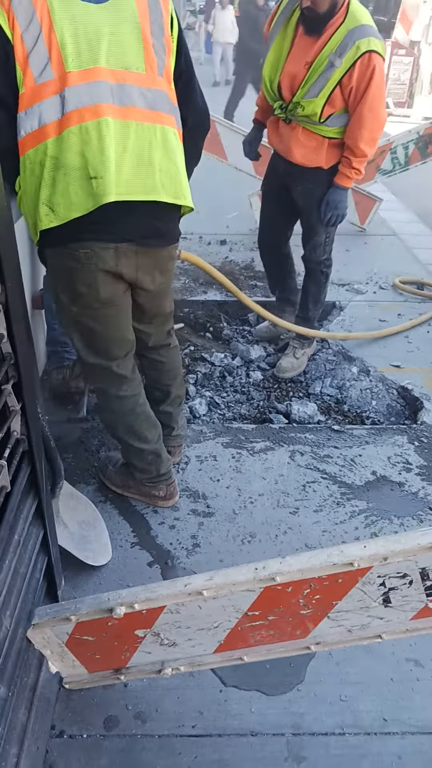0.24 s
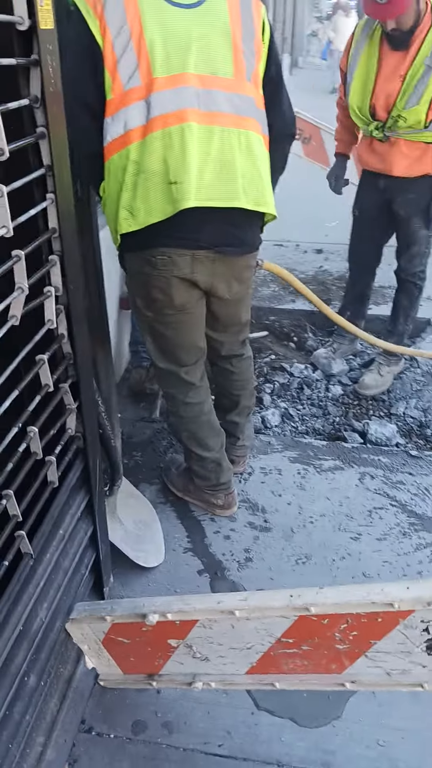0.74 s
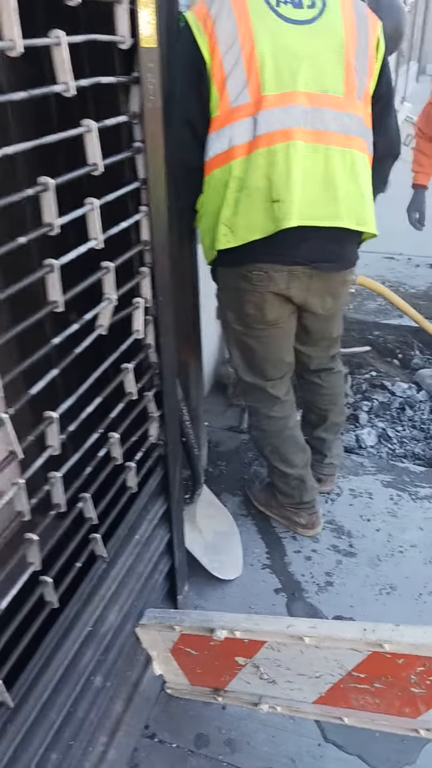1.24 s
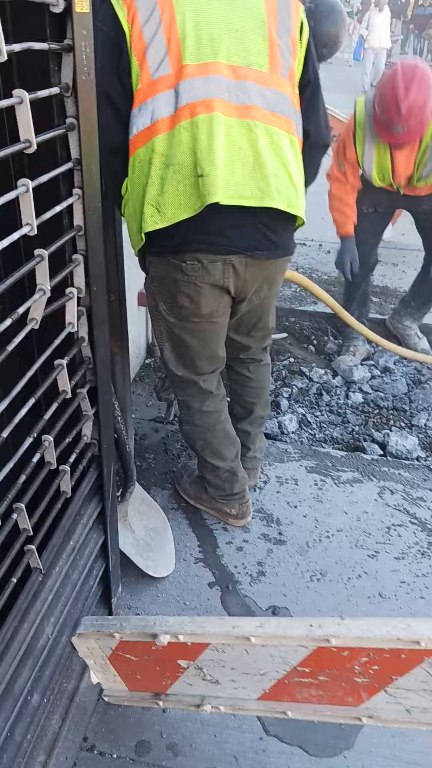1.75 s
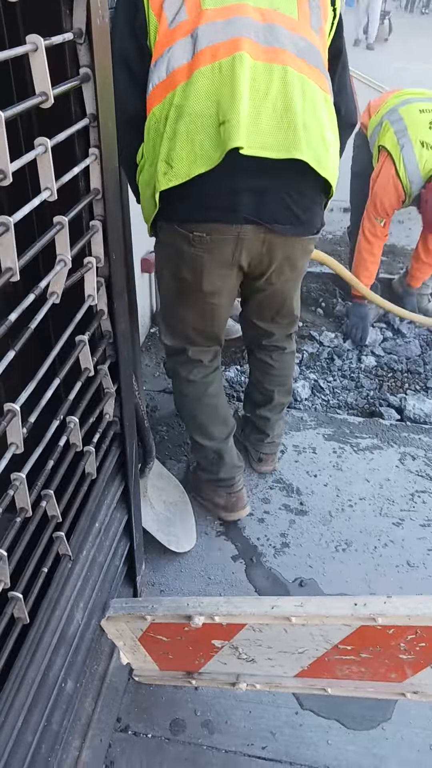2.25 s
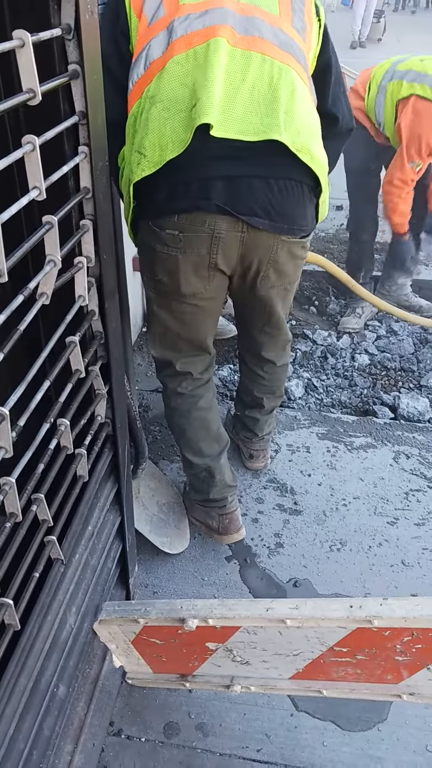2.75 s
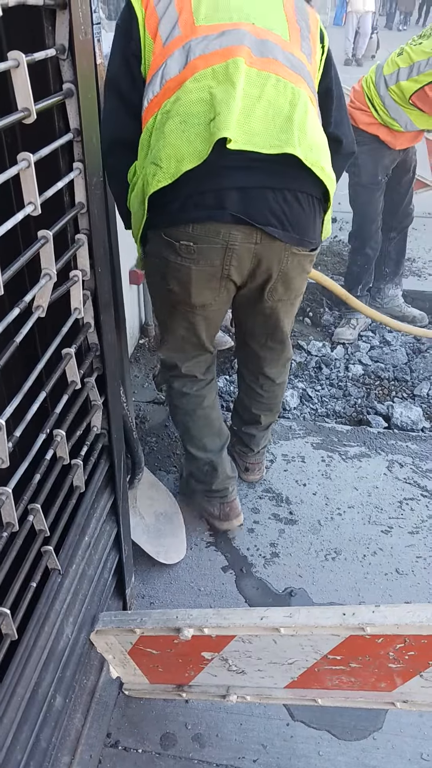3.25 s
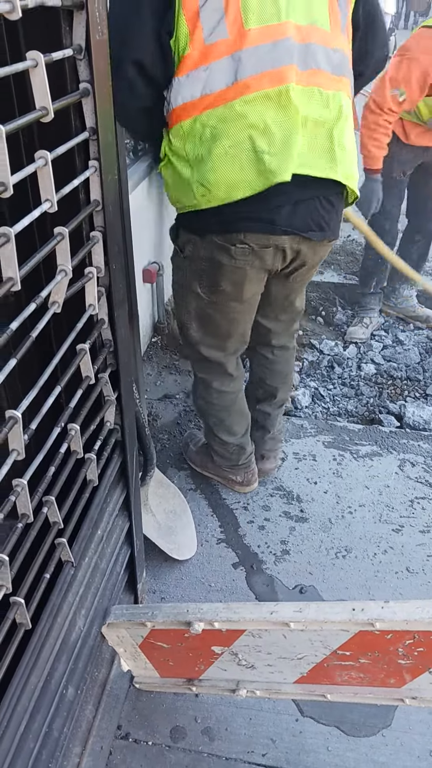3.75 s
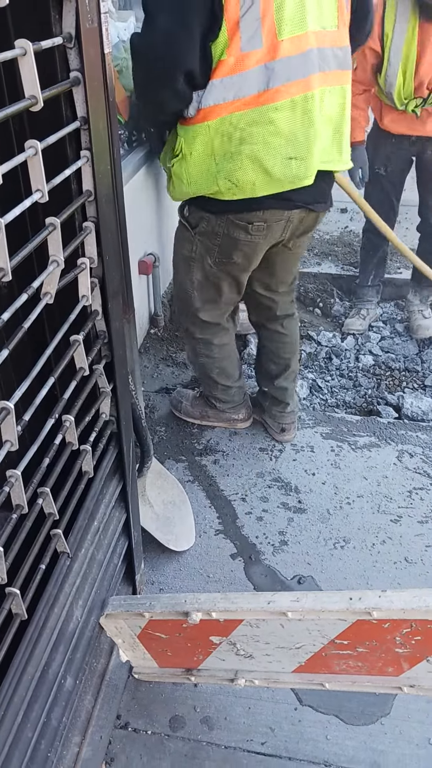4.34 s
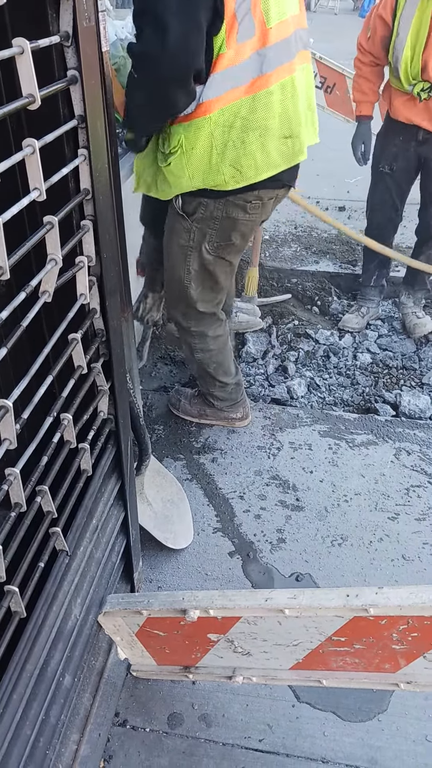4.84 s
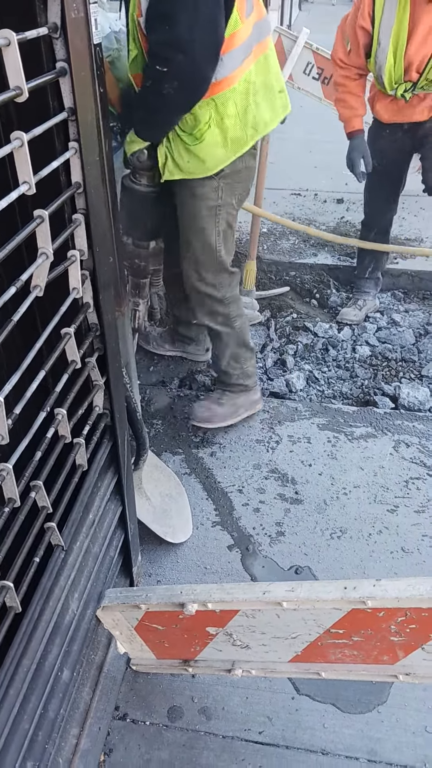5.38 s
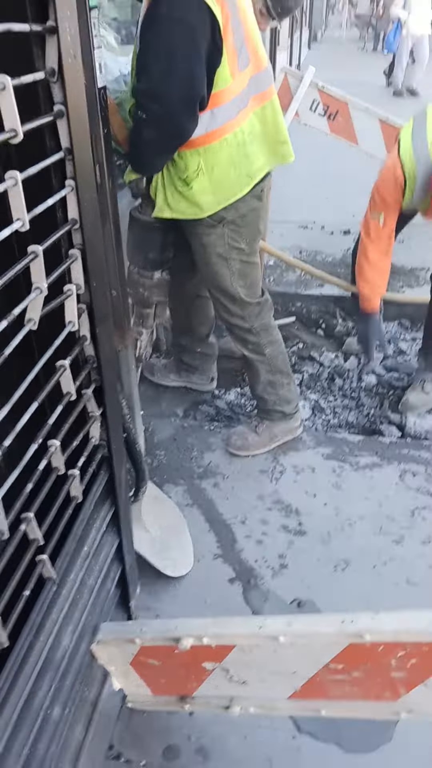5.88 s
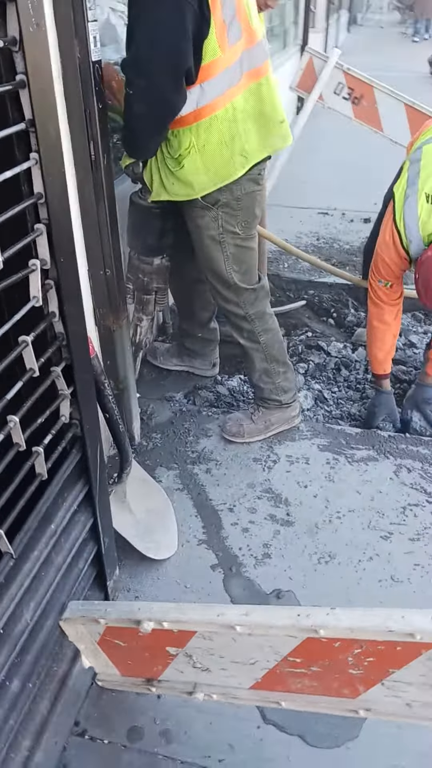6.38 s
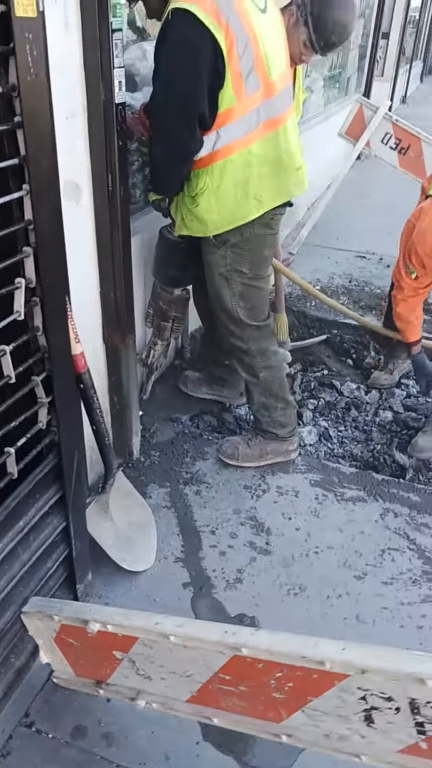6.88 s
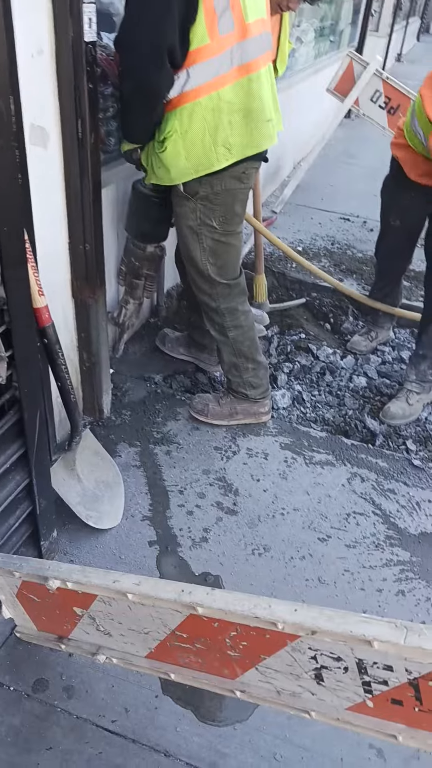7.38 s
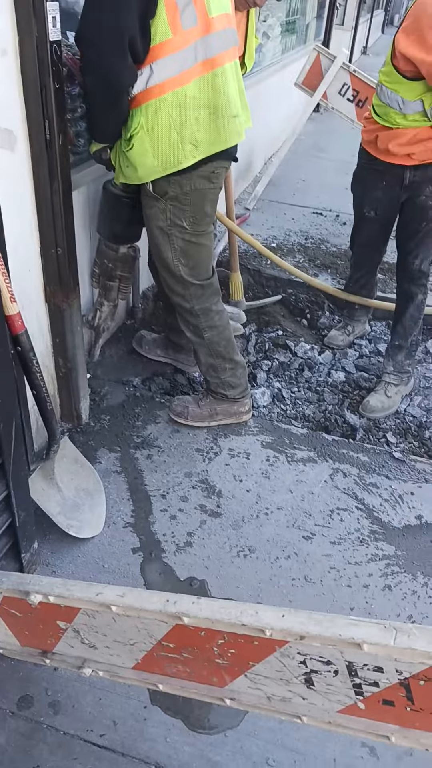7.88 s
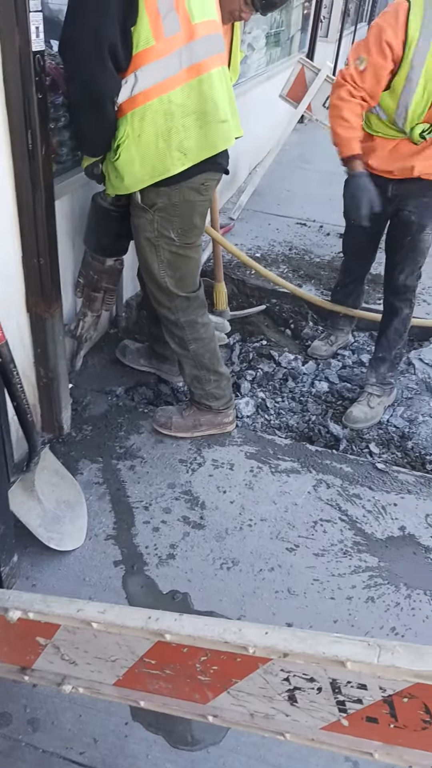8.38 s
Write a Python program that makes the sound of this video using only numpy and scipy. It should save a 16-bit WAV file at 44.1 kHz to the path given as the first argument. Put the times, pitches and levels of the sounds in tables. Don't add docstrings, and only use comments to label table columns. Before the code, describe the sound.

Loud jackhammer already running: deep exhaust pops, gritty air blasts and metallic bit ring in a fast rattle. It cuts off to low engine drone and street rumble; a very short false start follows, then the bit drags over rubble and crumbs tick down. Isolated thuds lead into a second long burst, its ring growing duller as the bit sinks. Outdoor street beside a shop front, handheld stereo, short wall reflections.

```python
import sys
import numpy as np
from scipy import signal
from scipy.fft import rfft, irfft, next_fast_len
from scipy.io import wavfile
from scipy.ndimage import uniform_filter1d

SR = 44100
rng = np.random.default_rng(int(sys.argv[2]) if len(sys.argv) > 2 else 0)


def pcm_store(signal):
    levels = np.round(np.clip(np.atleast_2d(signal), -1, 1) * 32767)
    wavfile.write(sys.argv[1], SR, levels.astype(np.int16).T)


N = 380141

# start_s, load
BACKGROUND_LOAD = [(0, 0.5), (2.05, 0.52), (2.25, .55), (2.55, .15), (3.3, 0.01), (3.5, 0.83), (4.0, 0.46),
                   (4.5, 0.09), (4.85, 0.19), (5.05, 0.97), (5.2, 0.88), (5.35, 0.99), (5.55, 0.98),
                   (5.75, 0.37), (8.6, 0.87)]
RETURN_S, LEAD_S = .0245, .0035


def gain_of(db):
    return np.exp(np.asarray(db) * (np.log(10) / 20))


def evened(x):
    return x / np.sqrt(np.mean(x ** 2) + 1e-20)


def read(points, hz):
    f, value = np.transpose(points)
    return np.interp(np.log(hz + 1), np.log(f + 1), value)


def coloured(x, points):
    size = next_fast_len(N)
    hz = np.fft.rfftfreq(size, 1 / SR)
    return irfft(rfft(x, size) * gain_of(read(points, hz)), size)[..., :N]


def train(s, size):
    return np.bincount(np.clip(np.round(s * SR).astype(int), 0, N - 1), size, N)


def ringing(modes, length):
    t = np.arange(length) / SR
    return sum(gain_of(db - 60 * t / t60) * np.sin(2 * np.pi * hz * t) for hz, db, t60 in modes)


def resonate(x, hz, width):
    turn = np.exp(2j * np.pi * np.cumsum(hz * np.ones(N)) / SR)
    r = np.exp(-np.pi * width / SR)
    return 2 * (turn * signal.lfilter([1 - r], [1, -r], x * turn.conj())).real


def lumps(width):
    once = uniform_filter1d(rng.standard_normal(N), int(width))
    return evened(uniform_filter1d(once, int(width)))


def pair(same, lead):
    a, b = rng.standard_normal((2, N))
    return np.array([a, same * np.roll(a, lead) + np.sqrt(1 - same ** 2) * b])


def mottled(x, patchy_db):
    z = signal.stft(x, nperseg=512)[2]
    patches = uniform_filter1d(rng.standard_normal(z.shape[:0:-1]), size=7, axis=0)
    patches = uniform_filter1d(patches, size=6, axis=1).T
    return signal.istft(z * gain_of(patchy_db * evened(patches)), nperseg=512)[1][:, :N]


def street():
    # pitch_hz, level_db (per Hz)
    wash_spectrum = [(18, -46), (30, -18), (69, -14), (97, -15.5), (168, -21), (284, -25), (673, -33),
                     (874, -33.5), (1360, -33.5), (1640, -33), (5740, -47), (6720, -54), (8060, -49.5),
                     (15500, -44.5)]
    # pitch_hz, width_hz, level_db
    fan_whine = [(1400, 44, -56.5)]
    # pitch_hz, likeness (-1 to 1)
    likeness = [(60, 0.3), (180, 1), (550, 0.19), (1650, -0.41), (4970, 0.12), (15000, -0.12)]
    frames, hz = N // 256 + 5, np.fft.rfftfreq(2048, 1 / SR)
    a, b, c, d, patches = rng.standard_normal((frames // 2 + 4, len(hz), 5)).T
    patches = evened(uniform_filter1d(uniform_filter1d(patches, 14, 0), 6, 1))
    same = np.clip(read(likeness, hz), -1, 1)[:, None]
    left = a + 1j * b
    right = same * left + np.sqrt(1 - same ** 2) * (c + 1j * d)

    load = np.clip(np.interp(np.arange(a.shape[1]) * 512 / SR, *np.transpose(BACKGROUND_LOAD)), 0, 2)
    rumble_db = -37.5 + 15 * load ** 2.3
    wash_db = -38 + 11.5 * load
    leak_db = -66 + 12 * load
    upper = np.clip(np.log2(hz / 200 + 1e-9), 0, 1)[:, None]
    treble_db = 0.5 * load * np.log2(np.maximum(hz / 4000, 1))[:, None]

    z = np.array([left, right]) * gain_of(read(wash_spectrum, hz)[:, None] + 1.3 * patches)
    z = z / np.sqrt(np.mean(abs(z) ** 2))
    z *= gain_of(rumble_db + upper * (wash_db - rumble_db) + treble_db)
    lines = sum(gain_of(db) / np.sqrt(width) * np.exp(-((hz - f) / (width + 12)) ** 2)
                for f, width, db in fan_whine)
    z += gain_of(50) * lines[:, None] * left * gain_of(rumble_db + 16)
    leak_band = np.exp(-((hz[:, None] - 6825) / 110) ** 2)
    z += leak_band * (c + 1j * b) * gain_of(leak_db + 19.0)
    return signal.istft(z, nperseg=2048, noverlap=1536)[1][:, :N] / 32


def engines():
    # start_s, firing_hz
    firing = [(0, 92), (2.3, 90), (2.7, 88), (3, 82), (3.4, 82), (5.55, 79), (6.2, 80), (8.6, 89)]
    # firing_multiple, level_db (rms, idling)
    compressor_orders = [(.5, -45), (1, -41), (1.5, -49), (2, -49), (4, -62)]
    # firing_multiple, level_db (rms)
    truck_orders = [(1, -40.5), (2, -49)]
    t = np.arange(0, N + 64, 64) / SR
    load = np.clip(np.interp(t, *np.transpose(BACKGROUND_LOAD)), 0, 2)
    compressor_hz, truck_hz = np.interp(t, *np.transpose(firing)), 63.3 + 0 * t
    out = 0
    for hz, orders in ((compressor_hz, compressor_orders), (truck_hz, truck_orders)):
        for k, db in orders:
            waver = uniform_filter1d(rng.standard_normal(len(t)), size=70)
            waver = evened(uniform_filter1d(waver, size=70))
            turns = k * np.cumsum(hz) * 64 / SR + rng.random()
            out = out + gain_of(db + 2 + 10.3 * load ** 2.6 + 2.9 * waver) * np.sin(2 * np.pi * turns)
    return signal.resample_poly(out, up=64, down=1)[:N]


def walls(x):
    # pitch_hz, t60_s
    wall_decay = [(100, 0.17), (500, 0.35), (2000, 0.35), (8000, 0.044), (16000, 0.074)]
    taps = np.zeros((2, SR // 2))
    at = np.arange(300, SR // 2 - 20, 20) + rng.integers(0, 20, (2, (SR // 2 - 301) // 20))
    np.put_along_axis(taps, at, rng.choice([-1., 1.], at.shape), 1)
    hz, t, z = signal.stft(taps, SR, nperseg=256)
    tail = signal.istft(z * gain_of(-60 * t / read(wall_decay, hz)[:, None]), SR, nperseg=256)[1]
    return signal.fftconvolve(x, tail / np.linalg.norm(tail[0]), axes=1)[:, :N]


def crumbs():
    # start_s, level_db, pitch_hz, t60_s
    falls = [(2.877, -41.5, 1400, 0.051), (3.1, -46.5, 2000, 0.072), (3.961, -34, 4060, 0.076),
             (4.104, -44, 1820, 0.26), (4.124, -60, 11000, .05), (4.37, -50, 9000, 0.063),
             (3.965, -43, 10500, 0.077), (5.553, -37, 2200, .06), (4.15, -38, 3300, 0.054),
             (4.37, -46, 2500, 0.068), (5.312, -36.5, 2510, 0.075), (5.52, -38, 2220, 0.47),
             (5.572, -21.5, 2210, 0.063)]
    out, t = np.zeros((2, N)), np.arange(SR // 8) / SR
    for s, db, hz, t60 in falls:
        band = signal.butter(2, [hz / 1.4, hz * 1.4], "band", fs=SR, output="sos")
        grit = signal.sosfilt(band, rng.standard_normal((2, len(t))))
        at = round(s * SR)
        out[:, at:at + len(t)] += evened(grit) * gain_of(db + 6.0 - 60 * t / t60) * np.minimum(t / 0.0048, 1)
    return out


def dragging():
    # start_s, grind_s, level_db
    drags = [
        (3.735, 0.036, -40.5),
        (3.885, 0.064, -37.5),
        (4.09, 0.055, -62),
        (4.2, .012, -64),
        (4.903, 0.053, -38.5),
    ]
    t = np.arange(0, N + 32, 32) / SR
    rise_s, fade_s = 0.01, 60 / 220
    steps = 0
    for s, grind, db in drags:
        corners = np.cumsum([0, rise_s, grind, fade_s])
        steps = steps + gain_of(db + np.interp(t - s, corners, [-20, 0, -3, -60], -99, -99))
    return np.interp(np.arange(N) / SR, t, steps)


def puffs(s, db, back, t60, back_db, rough_db, vary_db=1.17):
    chance = rng.standard_normal((len(s), 3)).T
    power = train(s - LEAD_S, gain_of(2 * (db + vary_db * chance[0])))
    return_s = s - LEAD_S + RETURN_S + 0.0019 * chance[1]
    power += train(return_s, back * gain_of(2 * (db + back_db + 2 * chance[2])))
    t = np.arange(SR // 5) / SR
    shut = np.minimum((t / 0.033) ** 4, 2)
    shape = np.minimum(t / 0.0028, 1) ** 2 * gain_of(-120 * t / t60 - 7.6 * shut)
    return np.sqrt(abs(signal.oaconvolve(power, shape)[:N])) * gain_of(rough_db * lumps(width=28))


def kicks(s, db, sign, back, back_db):
    chance = rng.standard_normal((len(s), 2)).T
    down = train(s, sign * gain_of(db + .8 * chance[0]))
    return down + train(s + RETURN_S + .0007, back * gain_of(db + back_db + 1.2 * chance[1]))


def strokes():
    # start_s, strokes_counted
    bursts = [
        [(.0087, 0), (.5414, 11), (1.1251, 23), (1.4097, 29), (1.6971, 35), (1.8919, 39), (2.1304, 44)],
        [(3.5303, 0), (3.624, 2)],
        [(5.6172, 0), (6.0452, 9), (6.43, 17), (7.0131, 29), (7.4439, 38), (7.5898, 41), (8.0697, 51),
         (8.5986, 62)],
    ]
    # start_s, blast_db, pop_db, ring_db, pop_sign
    lone = [(2.1876, -28, -22.5, -46, -1.65), (3.4846, -32, -21.5, -55, 0.95),
            (3.508, -25.5, -24, -40, 0.79), (3.679, -38, -26.5, -62, 0.91), (4.975, -30, -25, -25, 0.66),
            (5.009, -29.5, -14, -36, 0.94), (5.082, -37.5, -22, -63, 0.92), (5.558, -35, -19.5, -57, 1),
            (5.5634, -40, -17.5, -53, 0.93), (5.5701, -35, -16.5, -58, 0.85),
            (5.577, -37.5, -44, -55.5, 0.79), (5.597, -24, -23, -45, 0.63)]
    # start_s, bite (bit buried 0-1), aim_db (exhaust at the doorway), air_db (pressure)
    handlings = [
        [(0, .25, 2.5, 2), (.6, 0.33, 1, 1), (.85, 0.52, -13, 1.2), (1.1, 0.4, -26, 3.4),
         (1.25, 0.13, -2.5, 1.7), (1.55, 0.52, -2, 2.1), (1.8, 0.45, -18, 1.8), (1.95, 0.33, -1, 1),
         (2.13, 0.65, 2, 3)],
        [(3.53, .05, -7, 1.5), (3.624, 0.7, -12, 2.5)],
        [(5.61, 0, -3.5, 3), (5.8, 0.03, 1.5, 1.3), (6.05, 0.3, -4.5, 0.3), (6.3, 0.37, -0.5, 0.8),
         (6.6, 0.2, -2.5, 0.9), (6.9, 0.6, -9, 0), (7.2, 0.54, -3, -2), (8.1, 0.67, -5.5, -0.5),
         (8.6, 0.7, -21, -2)],
    ]
    # drum_db (slab), clack_db (tip)
    stances = [
        (-39.5, -39),
        (-41.5, -31),
        (-45, -32.5),
    ]
    rows = []
    for s, blast, pop, ring, sign in lone:
        rows.append((s, blast, pop, ring, blast - 2.5, pop - 12, blast - 15, blast - 11, sign, 0))
    for burst, handling, (drum_db, clack_db) in zip(bursts, handlings, stances):
        (s, count), (t, *controls) = np.transpose(burst), np.transpose(handling)
        for at in np.interp(np.arange(count[-1] + 1), count, s):
            bite, aim_db, air_db = (np.interp(at, t, control) for control in controls)
            blast, pop, ring = -25 + 2 * bite, -23 + air_db, -23 - 43 * bite
            crunch, boom = -25.5 + air_db, -25 + aim_db
            rows.append((at, blast, pop, ring, crunch, boom, drum_db + 13 * bite, clack_db - 2.5 * bite, 1, 1))
    return np.transpose(rows)


def bit(s, db, back):
    # pitch_hz, dragged_db, struck_db, t60_s (while struck)
    bar_modes = [(1868, -1, -10, .05), (3490, 2, -3, .04), (4312, -16, -20, .04), (5510, -3, -5, .04),
                 (7760, -11, -12, .06), (7990, -14, -16, .06), (8900, -19, -22, .06),
                 (10290, -13, -10, .08), (10585, -14, -6, .08), (11090, -22, 0, .07), (11880, -28, -8, .06),
                 (12960, -17, -4, .08), (13410, -17, -3, .08)]
    # start_s, level_db
    glances = [(.931, -33), (1.602, -31), (1.651, -28), (3.624, -28), (4.974, -30.5), (5.012, -31),
               (5.6648, -28.5), (5.807, -32), (5.854, -38), (5.903, -33), (6.238, -33), (6.82, -27)]
    chatter = puffs(s, db + 5, back, t60=0.12, back_db=-5.5, rough_db=4.5, vary_db=3.0)
    drag = dragging() * gain_of(3 * lumps(width=74) + 2.5)
    glance_s, glance_db = np.transpose(glances)
    glance = train(glance_s - .002, gain_of(glance_db + 33.5))
    stone_scrape = coloured(rng.standard_normal((2, N)), [(600, -26), (2000, 20.0), (5000, 8), (14000, -23)])
    out = 0.26 * drag * stone_scrape
    for drive, knocks, column, free in ((drag, glance, 1, 2), (chatter, 0, 2, 1)):
        body = ringing(np.array(bar_modes)[:, [0, column, 3]] * [1, 1, free], SR // 6)
        force = pair(0.4, 11) * drive + knocks
        out += signal.oaconvolve(force, body[None] / np.linalg.norm(body), axes=1)[:, :N]
    return out


def pops(s, db, boom_db, sign, back):
    # pitch_hz, level_db, t60_s
    muffler = [(40, -13.5, 0.049), (68, -23.5, 0.065), (80, -19, 0.031), (126, -29, 0.033),
               (160, -23, 0.047), (215.7, -17.5, 0.036)]
    # delay_s, level_db
    echoes = [
        (.0065, -15),
        (0.014, -13.5),
        (0.0202, -11.5),
        (0.033, -20.5),
    ]
    # pitch_hz, level_db
    port = [(40, -19), (70, -7), (120, -1.5), (170, -8), (230, 1), (320, -0.5), (450, -19), (700, 5)]
    t = np.arange(-.006, .012, 1 / SR)
    kick = 1.4 * np.exp(-((t - .0019) / .001) ** 2)
    kick -= np.exp(-((t + .0002) / .0016) ** 2)
    kick += .25 * np.exp(-((t + .0035) / .0014) ** 2)
    response = gain_of(-24) * ringing(muffler, SR // 5)
    response[0] = 1
    for delay, echo_db in echoes:
        response[round(delay * SR)] += gain_of(echo_db)
    vents = kicks(s - .006, db + 9, sign, back, back_db=-7)
    pop = signal.oaconvolve(vents, np.convolve(kick, response))[:N]
    thumps = kicks(s - .001, boom_db + 13.5, sign, back, back_db=-13.5)
    boom = signal.oaconvolve(thumps, ringing([(286, 0, 0.039)], SR // 8))[:N]
    return coloured(pop, port) - boom


def breaker():
    # pitch_hz, level_db (per Hz)
    blast_spectrum = [(1470, -21.5), (2500, -4), (3370, 1), (4870, -5.5), (5670, -3), (6720, -9),
                      (8260, -9), (10900, -1.5), (13000, 0), (15600, -8)]
    # pitch_hz, level_db (per Hz)
    crunch_spectrum = [(200, -9), (350, -7), (500, -7), (1000, -11), (1950, -9.5), (2700, -16), (3500, -21),
                       (4500, -19)]
    # start_s, pitch_hz
    slab_note = [(0, 813), (2.2, 792), (5.6, 547), (8.6, 540)]
    s, blast_db, pop_db, ring_db, crunch_db, boom_db, drum_db, clack_db, sign, back = strokes()
    blast = evened(coloured(pair(0.3, 9.7), blast_spectrum))
    blast *= puffs(s, blast_db + 11.5, back, t60=0.097, back_db=-8, rough_db=-0.5, vary_db=0.82)
    crunch = evened(coloured(pair(0.4, 8.7), crunch_spectrum))
    crunch *= puffs(s, crunch_db + 6.0, back, t60=.17, back_db=-17.5, rough_db=3.0, vary_db=1.0)

    note = np.interp(np.arange(N) / SR, *np.transpose(slab_note))
    strike = kicks(s - LEAD_S, drum_db + 53.5, sign, back, back_db=-8.5)
    drum = resonate(strike, note, 74)
    drum += gain_of(-22) * resonate(strike, 500, 730)
    drum += gain_of(-6.5) * resonate(strike, 526, 120)
    tip = puffs(s, clack_db + 30.0, back, t60=0.045, back_db=-5.0, rough_db=4.5, vary_db=1.5)
    clack = resonate(pair(0.69, 3.4) * tip, 2055, 420)

    bright = mottled(blast + crunch, patchy_db=2.0) + drum + clack + bit(s, ring_db, back) + crumbs()
    return bright, pops(s, pop_db, boom_db, sign, back)


def scene():
    bright, pressure = breaker()
    reflected = walls(gain_of(-12) * bright + gain_of(-15.5) * pressure)
    return bright + pressure + reflected + street() + engines()


def low_pass(x):
    return signal.sosfilt(signal.butter(12, 16800, fs=SR, output="sos"), x)


def record(dry):
    # pitch_hz, level_db (left minus right)
    tilt = [(60, 3.5), (120, -5), (240, -3.5), (480, -3.5), (950, 2.5), (1890, -3.5), (3770, 3),
            (7520, 9.5), (15000, 7.0)]
    half = np.array(tilt) * [1, .5]
    ports = np.array([coloured(dry[0], half), coloured(dry[1], half * [1, -1])])
    ports = signal.sosfilt(signal.butter(2, 36, "high", fs=SR, output="sos"), ports)
    limited = np.tanh(ports / 1.258) * 1.258
    band_edge = signal.firwin(401, 15950, window=("kaiser", 6), fs=SR)
    edged = signal.oaconvolve(limited, band_edge[None], "same")
    return low_pass(edged)


dry = scene()
out = record(dry)
pcm_store(out)
```